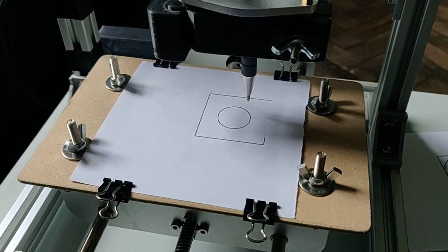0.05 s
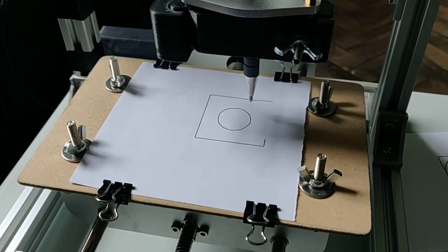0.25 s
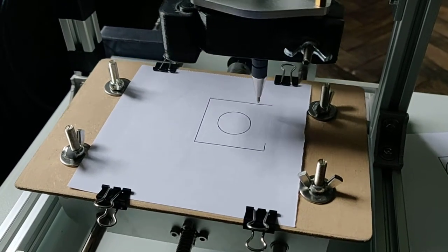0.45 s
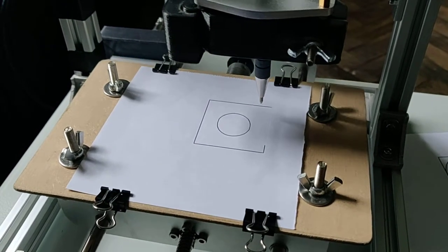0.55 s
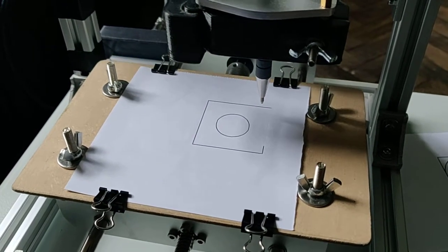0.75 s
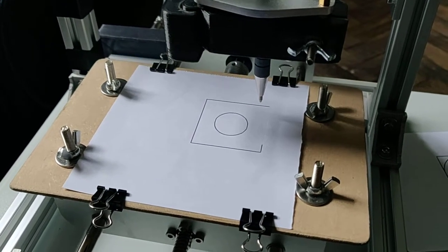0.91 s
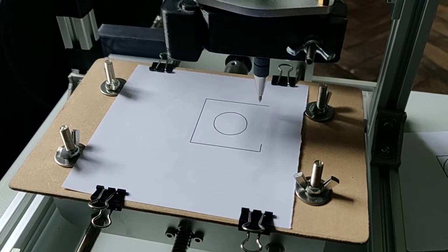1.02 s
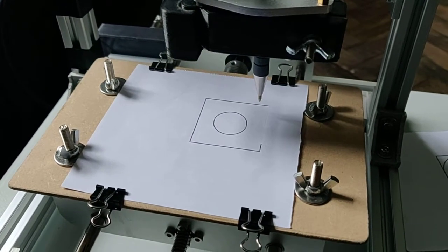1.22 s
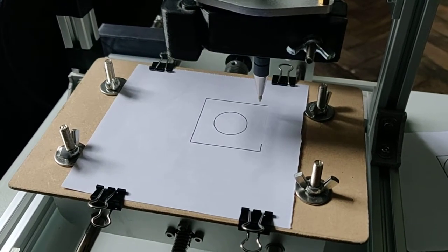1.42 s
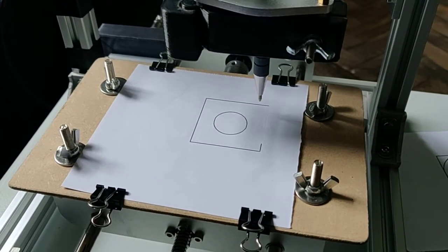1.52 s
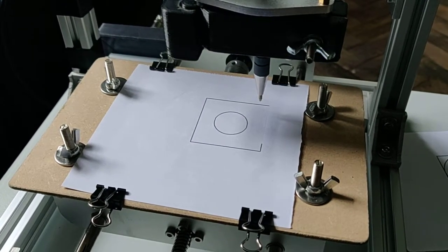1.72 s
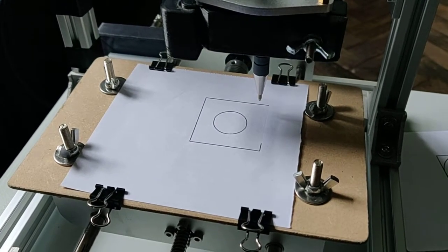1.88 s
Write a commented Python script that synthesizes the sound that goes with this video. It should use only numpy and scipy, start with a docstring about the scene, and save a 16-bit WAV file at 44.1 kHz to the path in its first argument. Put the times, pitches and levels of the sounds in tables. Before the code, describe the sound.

A pen plotter's small motors rise into a steady whine for one short move, with a rattle of loose fittings midway. They wind down and stop, leaving a faint fan and electrical hum, close by in a small room.

```python
"""A pen plotter idles in a small room: a cooling fan, mains hum and the hiss of energised coils.
At 0.2 s two stepper motors speed up for a short diagonal move, and their uneven steps rasp.
They settle into a steady whine at multiples of their step rates; midway the frame shudders and
loose fittings chatter. From 0.66 s the motors brake, with more rasp, shudder and chatter,
and the fan, hum and hiss carry on alone."""
import sys
import numpy as np
from scipy import signal
from scipy.fft import rfft, irfft
from scipy.io import wavfile
from scipy.ndimage import uniform_filter1d

SR = 44100
rng = np.random.default_rng(int(sys.argv[2]) if len(sys.argv) > 2 else 0)


def file_out(sig):
    """Save sig as 16-bit WAV at sys.argv[1]."""
    # one column per channel
    cols = np.atleast_2d(sig).T
    # limit, then scale
    lim = np.clip(cols, -1, 1)
    pcm = np.round(lim * 32767).astype(np.int16)
    wavfile.write(sys.argv[1], SR, pcm)


N = 85995
T = np.arange(N) / SR
BIN_HZ = np.fft.rfftfreq(2 * N, 1 / SR)


def undb(db):
    """Amplitude ratio of a level in decibels."""
    return 10 ** (np.asarray(db) / 20)


def unit(x):
    """Normalisation to an rms of 1."""
    return x / np.sqrt(np.mean(x ** 2))


def pan(db):
    """Level-difference panning: gains that put the left channel db above the right."""
    return undb(np.array([[db], [-db]]) / 2)


def drift(rate_hz):
    """Low-pass noise: a smooth random drift with a spread near 1."""
    span = max(int(SR / rate_hz), 1)
    held = np.repeat(rng.standard_normal(N // span + 1), span)
    return 1.234 * uniform_filter1d(uniform_filter1d(held, span), span)[:N]


def filtered(x, response):
    """Convolution theorem: filtering multiplies the spectrum by a frequency response."""
    return irfft(rfft(x, 2 * N) * response)[..., :N]


def resonator(x, colour, modes=()):
    """Source and filter: a minimum-phase response of unit energy, with modal peaks on a broad colour."""
    f = np.maximum(BIN_HZ, 1)
    hz, db = np.array(colour).T
    gain = undb(np.interp(np.log(f), np.log(hz), db))
    for centre_hz, width_hz, peak_db in modes:
        detuning = 2 * (f - centre_hz) / width_hz
        gain *= np.sqrt(1 + (undb(peak_db) ** 2 - 1) / (1 + detuning ** 2))
    cepstrum = irfft(np.log(unit(gain)))
    cepstrum[1:N] *= 2  # folding the cepstrum makes the response causal
    cepstrum[N + 1:] = 0
    return filtered(x, np.exp(rfft(cepstrum)))


# coherence of diffuse sound between left and right: frequency_hz, correlation
COHERENCE = [(30, 0.54), (60, 0.52), (130, 0.62), (290, 1), (400, 0.917), (640, 0.8), (1000, -0.01),
             (1410, -0.449), (2500, 0.088), (15000, -0.088)]


def diffuse(pair):
    """Spatial coherence: a diffuse field is alike at two spaced points only at long wavelengths."""
    hz, correlation = np.array(COHERENCE).T
    alike = np.clip(np.interp(BIN_HZ, hz, correlation), -1, 1)
    mid, side = filtered(pair, np.sqrt([(1 + alike) / 2, (1 - alike) / 2]))
    return np.array([mid + side, mid - side])


def room(x, wet_db, t60_s=.24, gap_s=.0034):
    """Reverberation: diffuse reflections from table and walls decay exponentially."""
    tail = rng.standard_normal((2, N)) * undb(-60 * T / t60_s) * (T > gap_s)
    tail /= np.sqrt(np.sum(tail ** 2, axis=1, keepdims=True))
    return diffuse(undb(wet_db) * filtered(x, rfft(tail, 2 * N)))


# spectrum of fan air, room noise and coil hiss: frequency_hz, gain_db
AIR_COLOUR = [(25, -11.5), (45, -19.5), (66, -5), (90, -7.5), (150, -14.5), (195, -8.5), (250, -9.5),
              (400, -8), (500, -11), (700, -12), (900, -13.5), (1200, -18.5), (1500, -18.5), (3000, -24),
              (5700, -27), (6300, -19), (7600, -21.5), (8500, -29), (12000, -30), (15500, -24.5)]
# resonances of the housing: centre_hz, width_hz, peak_db
HOUSING_MODES = [(200.2, 20.9, 5), (290.63, 21.16, 9.48), (326.2, 20.7, 10.24), (369.5, 29.3, 7.54),
                 (454, 30.5, 8.42), (568.1, 19.07, 12.56), (604, 18, 7.47), (636.6, 29.8, 8.03),
                 (689.23, 14.2, 13.77), (826.5, 12.9, 7.8), (1133.4, 27.2, 11.4), (1210.5, 8.7, 9.2),
                 (2432, 14.1, 8.8), (4238, 15.4, 9.47), (4291, 20.1, 15.97)]


def fan_and_coils(level_db=-48, flutter_db=.5):
    """Broadband excitation: the noise of fan and coils is coloured by the housing's resonances."""
    noise = diffuse(rng.standard_normal((2, N)))
    air = unit(resonator(noise, AIR_COLOUR, HOUSING_MODES))
    return air * undb(level_db + flutter_db * drift(30.53))


# steady tones of mains and fan: pitch_hz, level_db
HUM_TONES = [(120, -64), (295, -62), (319, -60), (570, -62.5), (607, -61.5)]


def hum():
    """Line spectrum: mains and fan are periodic sources, heard as steady sinusoids."""
    return sum(undb(db) * np.sqrt(2) * np.sin(2 * np.pi * (hz * T + rng.random()))
               for hz, db in HUM_TONES)


# bouts of rattling: start_s, attack_s, hold_s, release_time_constant_s, level_db
CHATTER_BOUTS = [(0.379, 0.0184, 0.0312, 0.0089, -29), (0.451, 0.0065, 0.0594, 0.0192, -46),
                 (0.668, 0.0153, 0.0048, 0.0099, -34.5), (.70, 0.0089, 0.0244, 0.0088, -46)]
# sharp single impacts within the chatter: time_s, impulse_db
SHARP_TICKS = [(0.396, -7), (0.4068, -8.5), (.4098, -15.5), (0.415, -7), (0.4339, -8.5)]
# broad response of the fittings: frequency_hz, gain_db
FITTING_COLOUR = [(100, -33), (220, -11), (400, -1.5), (800, 1.5), (1400, 2.5), (2300, -1), (3300, -9.5),
                  (5000, -10.5), (6300, -7), (8000, -13.5), (10000, -22.5), (15000, -18.5)]
# resonances of the fittings: centre_hz, width_hz, peak_db
FITTING_RESONANCES = [(1259, 55.4, 10.18), (1636, 11.2, 2.05), (1758.5, 40.5, 12.7), (1946, 47, 6.24),
                      (2249.6, 18, 7.44), (2963, 62, 6.55), (3299, 61, 7.96), (3830, 94, 8.94),
                      (4041, 25.7, 19), (4411, 52, 10.84), (6123, 110, 4.3)]


def chatter(taps_per_s=3000, scatter_db=.5):
    """Impact excitation: loose fittings tap at random in dense bouts and ring their modes."""
    envelope = np.zeros(N)
    for start, attack, hold, release, db in CHATTER_BOUTS:
        rise = np.clip((T - start) / attack, 0, 1)
        decay = np.exp(-np.maximum(T - start - attack - hold, 0) / release)
        envelope += undb(db) * rise * decay
    taps = (rng.random(N) < taps_per_s / SR) * undb(scatter_db * rng.standard_normal(N))
    taps = envelope * unit(taps * rng.choice([-1, 1], (2, N)))
    for time_s, db in SHARP_TICKS:
        taps[:, int(time_s * SR)] += undb(db) * rng.choice([-1, 1], 2)
    ringing = resonator(diffuse(taps), FITTING_COLOUR, FITTING_RESONANCES)
    return pan(1.5) * (ringing + room(ringing, wet_db=-7))


def swells(table, pitch_wobble=.0198):
    """Damped resonance: each vibration builds to a peak, then dies away almost exponentially."""
    out = np.zeros(N)
    for start_s, pitch_hz, peak_db, rise_s in table:
        age = np.maximum(T - start_s, 0) / rise_s
        envelope = (age * np.exp(1 - age)) ** 1.006
        hz = pitch_hz * (1 + pitch_wobble * drift(200))
        phase = 2 * np.pi * np.cumsum(hz * (T > start_s)) / SR
        out += undb(peak_db) * envelope * np.sin(phase)
    return out


# low resonances of the frame, excited by the steps: start_s, pitch_hz, peak_db, rise_s
FRAME_BOOMS = [(.2075, 555.8, -38, 0.0084), (.224, 289.5, -36, 0.00563), (.254, 228.9, -41.5, 0.0112),
               (.270, 280, -42, .006), (.425, 158.4, -45.5, 0.0204), (.440, 373.6, -39.5, 0.0125),
               (.475, 399.2, -45.5, 0.0129), (.664, 361, -37.5, 0.00514), (.735, 301, -37, 0.0106)]
# shudders of the pen holder: start_s, pitch_hz, peak_db, rise_s
HOLDER_SHUDDERS = [(.370, 1003, -40.5, 0.0065), (.3850, 990, -22.5, 0.0045), (.403, 891.2, -25, 0.00536),
                   (.406, 1053, -28.5, 0.0094), (.4212, 937.6, -21, 0.00507), (.443, 1075, -28, 0.00445),
                   (.470, 1065, -37.5, 0.00385), (.483, 1028, -28.5, .005), (.503, 1051, -43, 0.0167),
                   (.668, 1000, -30, 0.00383), (.6825, 1005, -25, 0.00574), (.707, 1008, -32.5, 0.006),
                   (.732, 974, -32.5, 0.00413)]


def frame(right_lag_s=.000224):
    """Structural resonance: the frame booms; the pen holder shudders, placed left by a time difference."""
    boom, shudder = swells(FRAME_BOOMS), swells(HOLDER_SHUDDERS)
    direct = boom + np.array([shudder, np.interp(T - right_lag_s, T, shudder)])
    return direct + room(boom + shudder, wet_db=-12.5)


START_S, RAMP_UP_S, BRAKE_S, RAMP_DOWN_S = .196, .083, .659, .084
BED_STEP_HZ, HEAD_STEP_HZ = 346.85, 416.75  # full-step rates at full speed


def carriage_speed(creep=.04, bend=1.2):
    """Near-trapezoidal motion, as a share of full speed: jump to a creep, accelerate, cruise, brake."""
    ramp = np.clip(np.minimum((T - START_S) / RAMP_UP_S, 1 - (T - BRAKE_S) / RAMP_DOWN_S), 0, 1)
    return (ramp > 0) * (creep + (1 - creep) * ramp ** bend)


def ramping(speed):
    """Smoothed gate: 1 under acceleration or braking, otherwise 0."""
    return uniform_filter1d(((speed > 0) & (speed < 1)) * 1., size=200)


# spectrum of the rasp on the ramps: frequency_hz, gain_db
RAMP_COLOUR = [(100, -6.5), (250, 3), (450, 2), (800, 4), (1500, 3), (2600, -0.5), (3400, -3.5), (4800, -4),
               (7300, 1), (9300, -25.5), (15000, -19)]
# spectrum of the rasp at full speed: frequency_hz, gain_db
CRUISE_COLOUR = [(100, -5.5), (350, 2), (1100, 0.5), (2000, -5.5), (3500, -12.5), (5000, -8), (7300, -2.5),
                 (9300, -38), (12000, -21), (15000, -18)]
# resonances of the motor mounts: centre_hz, width_hz, peak_db
MOUNT_RESONANCES = [(1409, 55, 5), (1800, 56, -3), (2099, 48, 7), (2812, 103, 5), (4285, 170, 5),
                    (5450, 70, 1), (6540, 158, 5)]


def step_rasp(speed, microsteps=16, scatter_db=3, ramp_db=-42.5, cruise_db=-47):
    """Irregular impulse train: each microstep jolts the frame differently, most of all on the ramps."""
    step_count = np.floor(np.cumsum(microsteps * BED_STEP_HZ * speed) / SR)
    jolts = np.diff(step_count, prepend=0) * rng.choice([-1, 1], (2, N))
    jolts *= undb(scatter_db * rng.standard_normal(N))
    jolts /= np.sqrt(speed + .028)  # slower steps hit harder
    jolts = diffuse(jolts / np.sqrt(np.mean(jolts[:, speed > 0] ** 2)))
    ramp = ramping(speed)
    rasp = undb(ramp_db) * resonator(jolts * ramp, RAMP_COLOUR, MOUNT_RESONANCES)
    rasp += undb(cruise_db) * resonator(jolts * (1 - ramp), CRUISE_COLOUR)
    return pan(-.5) * (rasp + room(rasp, wet_db=-2))


def motor_whine(speed, step_hz, tones, ramp_jitter=.05, ramp_boost_db=2.2, shimmer_db=.4, cutoff_hz=243):
    """Forced vibration: the frame radiates multiples of the step rate, unsteady on the ramps."""
    ramp = ramping(speed)
    rate_hz = step_hz * speed * (1 + ramp_jitter * ramp * drift(700))
    cycles = np.cumsum(rate_hz) / SR
    travel = np.cumsum(speed) / np.sum(speed) - .5  # -0.5 to 0.5 over the move
    whine = np.zeros((2, N))
    for multiple, db, pan_db, growth_db, lag_s in tones:
        efficiency = 1 - np.exp(-(multiple * rate_hz / cutoff_hz) ** 4)  # low tones radiate poorly
        gain = efficiency * pan(pan_db) * undb(db + growth_db * travel + shimmer_db * drift(27.4))
        stereo_cycles = multiple * np.array([cycles, cycles - rate_hz * lag_s])
        whine += gain * np.sqrt(2) * np.sin(2 * np.pi * (stereo_cycles + rng.random()))
    whine *= np.sqrt(speed) * undb(ramp_boost_db * ramp)
    return whine + room(whine, wet_db=-16.5)


# partials of the bed motor: step_rate_multiple, level_db, left_minus_right_db, growth_db, right_lag_s
BED_PARTIALS = [(1, -48.5, 2, -4, 0.000173), (4, -59, 8.5, 7.5, 0.000286), (6, -65, -12.5, -4, 0.000328),
                (8, -72, -3, 6, 0.000414), (10, -90.5, 2, -4.5, 0.00037), (12, -65.5, -6, -3, 0.000341),
                (14, -72, 6.5, -16.5, 0.000345), (15.5, -71.5, 0.5, 5.5, 0.000404),
                (16, -47.5, 0.5, -1.5, 0.0003228), (16.5, -72.5, 7, 4, .00033),
                (18, -54.5, 6.5, -1, 0.000384), (20, -82.5, 0.5, -1, 0.00033), (21, -86, -1, 1.5, 0.00037),
                (22, -69, -14, -2.5, 0.000338)]
# partials of the head motor: step_rate_multiple, level_db, left_minus_right_db, growth_db, right_lag_s
HEAD_PARTIALS = [(2, -51.5, 0.5, 14.5, 0.000236), (4, -61, -9.5, 4, 0.000474), (6, -68, 12, 1, 0.00015),
                 (8, -71, 9.5, 6, 0.00032), (12, -75.5, -3.5, -5, 0.00028), (14, -71, 1, 10.5, 0.000196),
                 (16, -44.5, 3.5, 1.5, 0.0002542)]


def motors(speed):
    """Fixed frequency ratio: both steppers follow one speed curve, so their pitches glide together."""
    bed = undb(.5) * motor_whine(speed, BED_STEP_HZ, BED_PARTIALS)
    head = undb(-.5) * motor_whine(speed, HEAD_STEP_HZ, HEAD_PARTIALS)
    return bed + head


def scene():
    """Superposition: one move of the carriage adds to the sound of the idling machine."""
    speed = carriage_speed()
    return motors(speed) + fan_and_coils() + hum() + step_rasp(speed) + frame() + chatter()


# treble imbalance of the two microphones: frequency_hz, left_minus_right_db
TREBLE_BALANCE = [(100, 0), (5500, 0), (6300, 5), (7100, -1.5), (7900, -8.5), (9000, -0.5), (11000, -2.5),
                  (15500, -1)]


def record(dry, top_hz=15800):
    """Frequency response: each microphone colours the treble, and a steep low-pass limits the band."""
    hz, db = np.array(TREBLE_BALANCE).T
    tilt_db = np.interp(BIN_HZ, hz, db) / 2
    coloured = filtered(dry, undb([tilt_db, -tilt_db]))
    return signal.sosfilt(signal.ellip(10, .2, 70, top_hz, fs=SR, output="sos"), coloured)


dry = scene()
out = record(dry)
file_out(out)
```